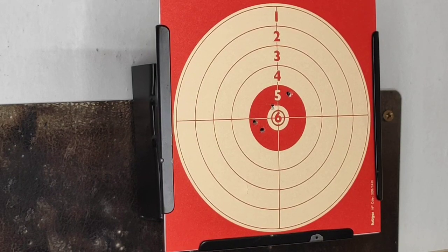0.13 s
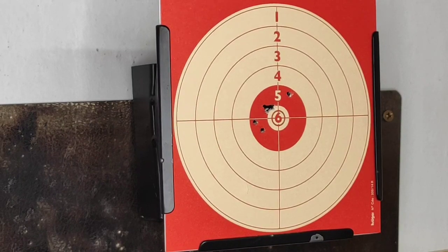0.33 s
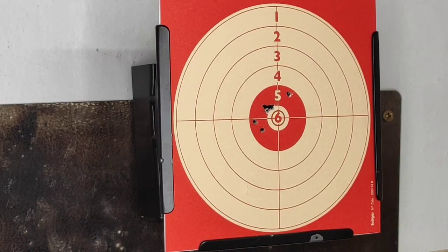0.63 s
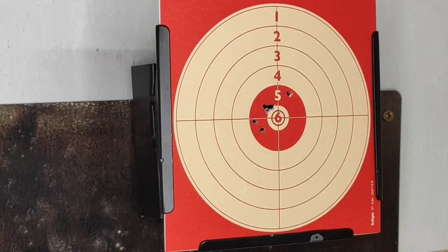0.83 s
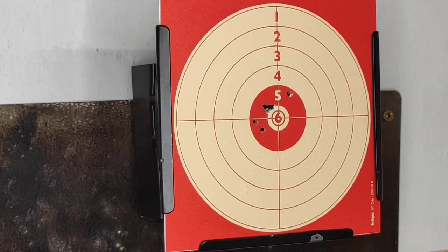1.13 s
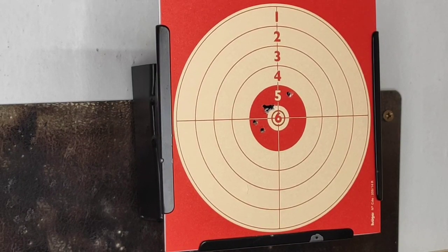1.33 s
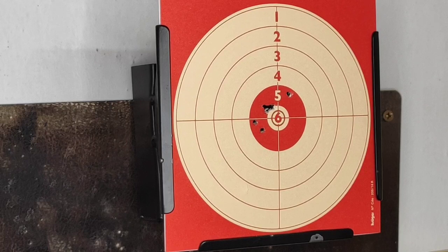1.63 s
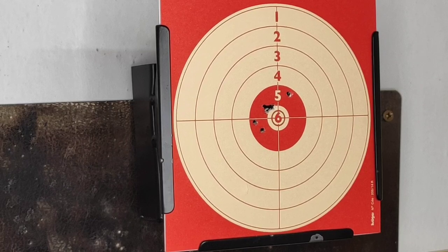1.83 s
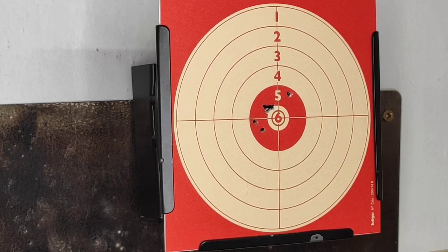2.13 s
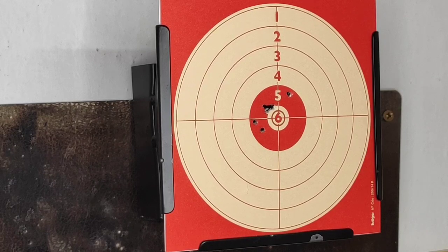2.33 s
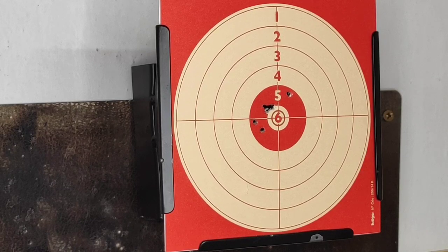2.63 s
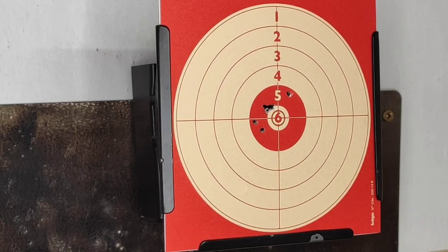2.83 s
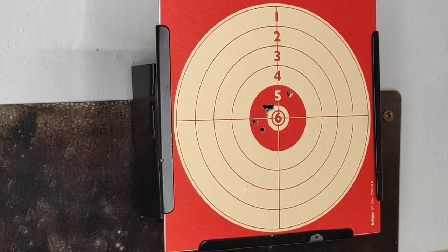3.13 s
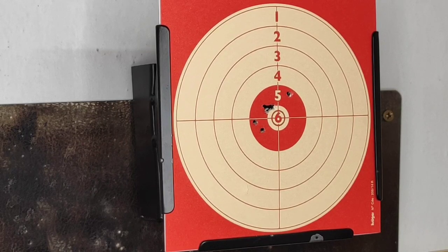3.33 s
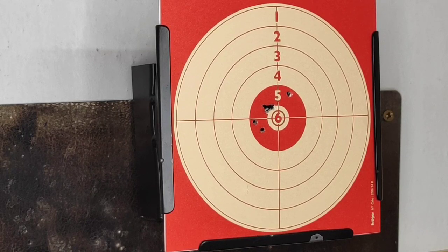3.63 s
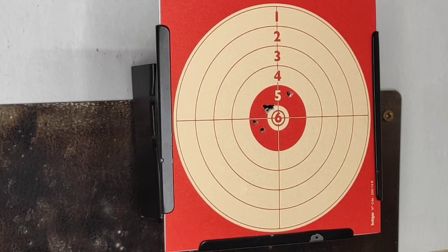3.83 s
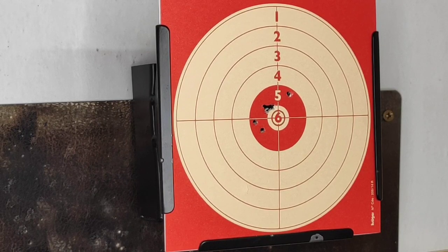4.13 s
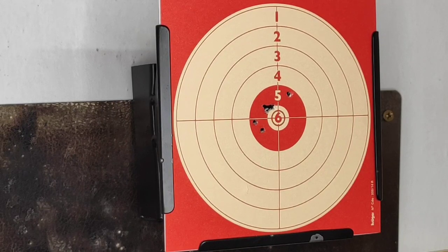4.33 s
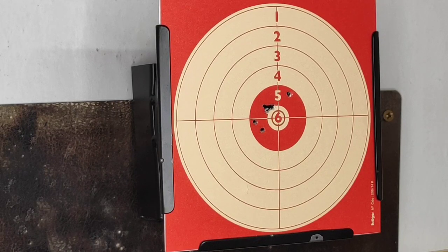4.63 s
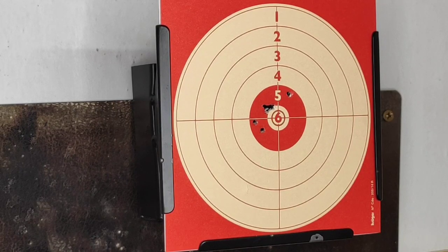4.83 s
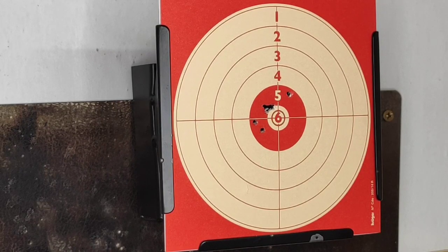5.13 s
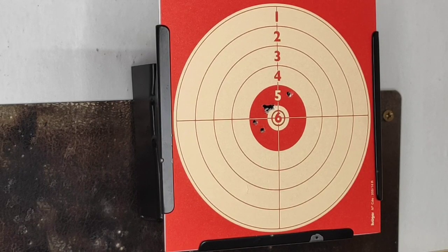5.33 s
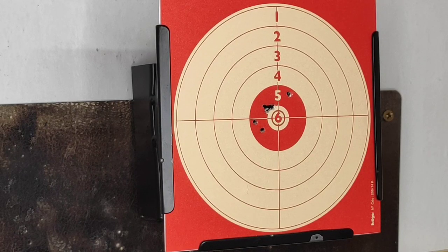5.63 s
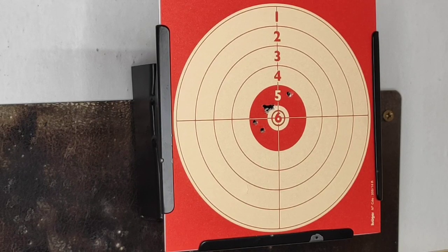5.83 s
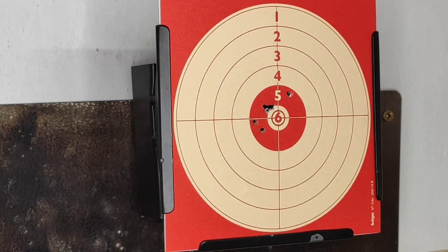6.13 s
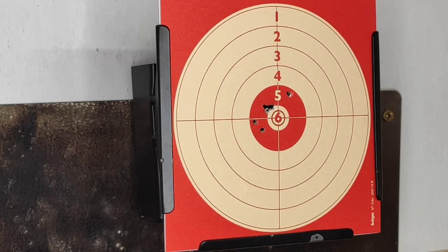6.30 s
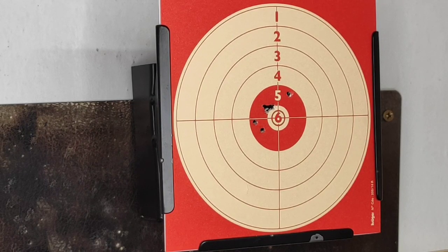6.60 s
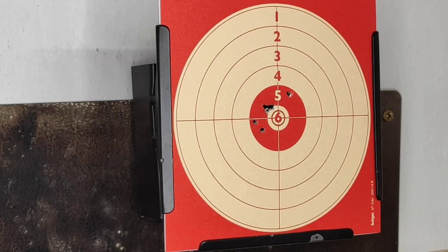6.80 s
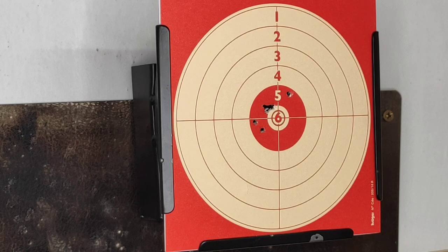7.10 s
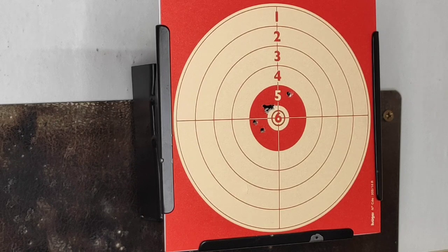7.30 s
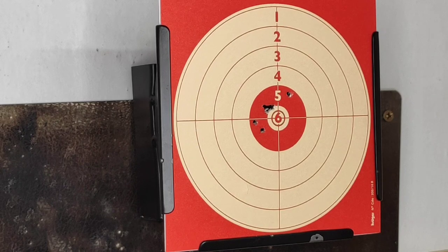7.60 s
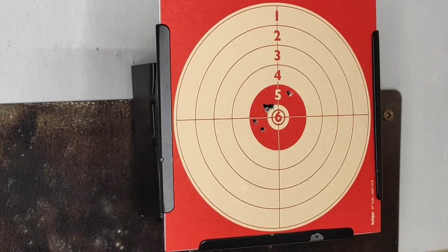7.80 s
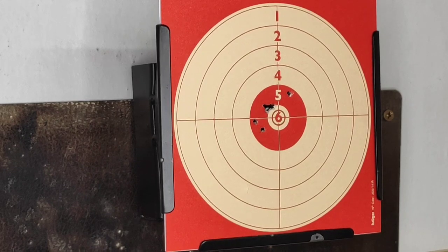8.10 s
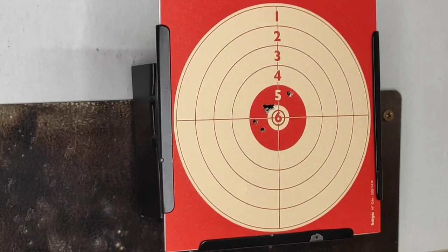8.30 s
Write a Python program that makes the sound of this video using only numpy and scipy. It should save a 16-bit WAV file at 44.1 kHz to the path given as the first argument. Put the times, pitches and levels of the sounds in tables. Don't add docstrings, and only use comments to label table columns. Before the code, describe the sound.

A sharp, clipped crack and steel impact come first, close to the microphone, ringing through a reverberant bare room. Afterwards, towards the left and farther away, hands handle the gun: a breathy air rush, a bright latch snap, small knocks, two hard clacks each preceded by a tiny squeak, then a longer, rougher hiss with sticking ticks and a few faint final taps.

```python
import sys
import numpy as np
from scipy import signal
from scipy.fft import rfft, irfft, next_fast_len
from scipy.io import wavfile
from scipy.ndimage import uniform_filter1d

SR = 44100
rng = np.random.default_rng(int(sys.argv[2]) if len(sys.argv) > 2 else 0)


def persist_wave(psi):
    counts = np.round(np.clip(psi, -1, 1) * 32767).astype(np.int16)
    wavfile.write(sys.argv[1], SR, np.atleast_2d(counts).T)


def makeup_ratio(level_db):
    decades = np.asarray(level_db, float) / 20
    return 10 ** decades


N = 372837

# f/Hz, gain/dB
MICROPHONE = [(20, 6), (1500, 6), (4000, 2), (8800, 2), (9700, -5), (10600, -11.5), (13000, -7.5),
              (15500, -11)]
# t/s, peak level/dB, brightness/dB, ring f/Hz
SLIPS = [(2.1334, -37, -9, 7600), (2.2267, -37.5, 2, 6570), (2.2896, -42, 3, 6200), (7.369, -36, 2, 3130),
         (7.4105, -38, 3, 3680), (7.4648, -29, 1, 6590), (7.5377, -30.5, 0, 3720),
         (7.6223, -32.5, -1, 3730), (7.6871, -35, -3, 6580)]


def unit(x):
    return x / np.sqrt(np.mean(x ** 2) + 1e-20)


def along(points, hz):
    f, v = np.transpose(points)
    return np.interp(np.log(hz + 1), np.log(f + 1), v)


def filtered(x, response):
    n = x.shape[-1]
    m = next_fast_len(n + 8192)
    return irfft(rfft(x, m) * response(np.fft.rfftfreq(m, 1 / SR)), m)[..., :n]


def add(total, part, s):
    spot = total[..., int(s * SR):][..., :part.shape[-1]]
    spot += part[..., :spot.shape[-1]]


def section(*corners):
    s, db = np.transpose(corners)
    t = np.arange(s[0], s[-1], 1 / SR)
    return t, np.interp(t, s, db)


def lift(hz, peaks):
    return sum(db / (1 + (2 * (hz - c) / w) ** 2) for c, w, db in peaks)


def patchy(n, depth_db):
    z = signal.stft(rng.standard_normal(n + 512), nperseg=512)[2]
    field = uniform_filter1d(rng.standard_normal(z.shape), size=3, axis=0)
    field = uniform_filter1d(field, size=14, axis=1)
    return signal.istft(z * makeup_ratio(depth_db * unit(field)), nperseg=512)[1][:n]


def walls(wet_db, left_db, rise):
    # f/Hz, t60/s
    room = [(60, 0.35), (300, .5), (1000, 0.42), (3000, 0.45), (8000, 0.36), (13000, 0.29)]
    hz, t, z = signal.stft(rng.standard_normal((2, int(.55 * SR))), SR, nperseg=256)
    decay = makeup_ratio(-60 * t / along(room, hz)[:, None])
    tail = signal.istft(z * decay, SR, nperseg=256)[1]
    t = np.arange(tail.shape[1]) / SR
    echoes = uniform_filter1d(rng.standard_normal(tail.shape), size=25) * 5
    tail = tail * (1 - np.exp(-t / rise)) * makeup_ratio(4 * np.exp(-t / .06) * echoes)
    tail = tail / np.linalg.norm(tail, axis=1)[:, None]
    return makeup_ratio(wet_db) * tail * makeup_ratio([[left_db / 3], [-left_db / 3]])


def direct(x, left_db, size):
    lag = 13
    left = np.pad(x, (0, size))[:size]
    right = np.pad(x, (lag, size))[:size]
    return np.array([left, right]) * makeup_ratio([[left_db / 2], [-left_db / 2]])


def heard(x, wet_db, left_db):
    echoes = signal.fftconvolve(x[None], walls(wet_db, left_db, rise=0.0037), axes=1)
    return echoes + direct(x, left_db, size=echoes.shape[1])


def blow(db, low_db, mid_db, high_db, ring_hz, t60, wet_db, left_db):
    # f/Hz, width/Hz, lift/dB
    gun = [(520, 150, 2.5), (927, 53, -2.5), (1200, 67, -5), (2130, 1400, 6.5), (3360, 400, 2),
           (4120, 540, 4), (5100, 100, -5.5), (7130, 600, -11)]
    colour = [(150, low_db - 26.5), (330, 1.5 * low_db - 2.5), (520, low_db + 0.6), (800, low_db + 4.5),
              (1500, (low_db + mid_db) / 2 - 0.8), (2600, mid_db), (6500, 0), (12500, high_db + 17)]
    body = [(c, w, level * rng.uniform(0, 0.83)) for c, w, level in gun]
    body += [(ring_hz, 0.081 * ring_hz, 6)]
    small_hz = 500 * 24 ** rng.random(24)
    body += [(c, .03 * c, 5.5 * u) for c, u in zip(small_hz, rng.random(24))]
    burst = rng.standard_normal(8192) * makeup_ratio(-60 * np.arange(8192) / SR / t60)
    echoes = walls(wet_db, left_db, rise=t60 / 3)
    both = echoes + direct(burst / np.linalg.norm(burst), left_db, size=echoes.shape[1])
    return makeup_ratio(db + 20.5) * filtered(both, lambda hz: makeup_ratio(along(colour, hz) + lift(hz, body)))


def struck(rows, part):
    out = np.zeros((2, N))
    mid_db, high_db, *room = part
    for s, db, heft_db, bright_db, ring_hz in rows:
        thinned_db = mid_db - .7 * bright_db
        add(out, blow(db, heft_db, thinned_db, high_db + bright_db, ring_hz, *room), s)
    return out


def floor():
    # f/Hz, level/(dB per Hz)
    still_air = [(8, -32.5), (15, 4), (25, -6.5), (38, -15.5), (74, -21), (205, -29), (520, -34),
                 (1760, -44), (4000, -50), (9000, -53), (10300, -57.5), (12500, -52.5), (15600, -53.5)]
    noise = filtered(rng.standard_normal((2, N)), lambda hz: makeup_ratio(along(still_air, hz)))
    return makeup_ratio(-55.5 + 3.5) * unit(noise)


def contacts():
    # t/s, peak level/dB, heft/dB, brightness/dB, ring f/Hz
    taps = [(0.2924, -56, 6, -8, 2060), (3.1222, -49, -19, 2, 2410), (3.2552, -45, -24, 1, 6160),
            (7.8056, -41, -4.5, -3, 4160)]
    nudges = [(0.8597, -57, -7, 0, 1227), (0.9189, -54, -11, -4, 1020), (1.1307, -57, -2, 2, 2360),
              (1.2639, -48, -6, -6, 2600), (1.696, -45, -12, 0, 8830), (3.5246, -52.5, -28, 2, 3720),
              (3.7423, -44.5, -15, -3, 2190), (4.33, -52.5, -11, -3, 3020), (4.5601, -40.5, -9.5, 3, 3340),
              (4.7865, -44, -1, 0, 902), (4.7923, -33, -3, -3, 340), (4.9857, -44, -7, -7, 1930),
              (5.1551, -43, -26, 4, 8740), (5.525, -30.5, -7, 3, 2147), (5.8155, -53.5, -5.5, 4, 2138),
              (6.847, -50.5, 2, -6, 1040), (6.9698, -56.5, -6, 2, 5800), (7.0932, -34, -13, 1, 7040),
              (7.889, -52.5, -1.5, -4, 4110)]
    latches = [(1.4085, -46.5, -14, -3.5, 9000), (1.6139, -44, -16, 3, 8300), (2.398, -42, -9, -5, 8600),
               (2.4636, -34, -19, -4, 6800), (2.5414, -14.5, -22, 1.5, 7130),
               (2.762, -29.5, -9.5, -2.5, 7470), (4.483, -23.5, -17, 0, 8830),
               (5.1644, -31.5, -17, 6, 9060), (6.2776, -34, -24, 0, 5240)]
    clacks = [(1.726, -32, -21, -1, 2770), (3.5433, -41, -16, 3, 3710), (3.5707, -21, -15.5, -3, 1500),
              (3.9914, -58, -11, 2, 3065), (4.2457, -53, 3, 3, 877), (5.3071, -4.5, -8.5, -1, 2190),
              (6.0204, -40, -8, -7, 2730), (6.3653, -2, -9, 0, 2327), (7.968, -55, -3, 0, 3950),
              (8.308, -63, -12, 0, 1053)]
    openings = [(4.8083, -26.5, -7, -2, 1310), (5.831, -40, -4, 0, 1274), (5.8432, -28, -5, 1, 1290)]
    ticks = [(s, db, -15, *rest) for s, db, *rest in SLIPS]
    # mid/dB, high/dB, burst t60/s, echo level/dB, left/dB
    damped = (-4, -31, .018, 8, 8)
    latch, lever = (-8, -16, .018, 8, 8), (-3.5, -15.5, .018, 8, 8)
    piston, slide = (-16, -8, .018, 8, 8), (-6, -16, .053, 7.5, 10)
    hollow = (-4, -18, .053, 7.5, 10)
    kinds = [(latches, latch), (clacks, lever), (taps, damped),
             (ticks, piston), (nudges, slide), (openings, hollow)]
    return makeup_ratio(-3) * sum(struck(*kind) for kind in kinds)


def shot():
    # t/s, peak level/dB, heft/dB, brightness/dB, ring f/Hz
    impacts = [
        (0.338, -28.5, -6.5, 0, 4990),
        (0.3454, -1.5, -13, -3, 6624),
        (.379, 1, -21, 0, 1900),
    ]
    # f/Hz, level/dB, t60/s
    trap = [(737, -7.5, .2), (1890, -20, .55)]
    blast = (-9.5, -10, .014, 14.5, 10.5)  # mid/dB, high/dB, burst t60/s, echo level/dB, left/dB
    out = struck(impacts, blast)
    t = np.arange(SR // 2) / SR
    ring = sum(makeup_ratio(db - 60 * t / t60) * np.sin(2 * np.pi * hz * t) for hz, db, t60 in trap)
    add(out, heard(ring * (1 - np.exp(-t / .008)), wet_db=-12, left_db=1.5), .392)
    return out


def thuds():
    # t/s, level/dB, top f/Hz, t60/s
    shocks = [(.346, -29, 59.63, .9), (.378, -14.5, 299, 0.14), (4.8, -47.5, 153.3, 0.16),
              (5.307, -79, 101.7, 0.16), (6.365, -44, 103, 0.22), (7.69, -49, 300, 0.78),
              (7.8, -65, 250, 0.43)]
    out, t = np.zeros((2, N)), np.arange(SR // 2) / SR
    for s, db, top_hz, t60 in shocks:
        dull = lambda hz: (hz > 18) / (1 + (hz / top_hz) ** 3)
        noise = unit(filtered(rng.standard_normal((2, len(t))), dull))
        add(out, makeup_ratio(db - 60 * t / t60) * (1 - np.exp(-t / .003)) * noise, s)
    return out


def settling():
    # t/s, left amplitude, right amplitude, width/s
    jolts = [(.347, .45, 0, .002), (.381, .1, .35, .006)]
    clock = np.arange(N) / SR
    t = clock - np.array([[.372], [.362]])
    age = np.clip(t, .036, None)
    swing = np.sin(np.pi * np.log(age / .06)) * np.exp(-(age / .29) ** 1.6)
    start = np.clip((t - [[-.012], [-.018]]) / [[.04], [.008]], 0, 1)
    kicks = sum(np.outer([left, right], np.exp(-((clock - s) / width) ** 2))
                for s, left, right, width in jolts)
    return np.array([[.32], [.27]]) * start * swing + kicks


def rustle():
    moves = [(.53, -33.5, 300, 165), (1.3, -62, 12, 8), (2.03, -44, 50, 45), (2.7, -61, 10, 60),
             (3.69, -52, 200, 150), (4.75, -63, 12, 5), (5.39, -37.5, 140, 110), (6.45, -37, 190, 95),
             (7.22, -45, 150, 22)]
    # f/Hz, level/(dB per Hz)
    cloth_colour = [(500, -29.5), (1500, -3.5), (2500, -0.5), (4200, -0.5), (9000, -7.5), (15000, -16.5)]
    t = np.arange(N) / SR
    db = np.max([top - np.maximum(rise * (s - t), fall * (t - s)) for s, top, rise, fall in moves], axis=0)
    cloth = unit(filtered(patchy(N, depth_db=4.5), lambda hz: makeup_ratio(along(cloth_colour, hz))))
    return heard(makeup_ratio(db - 7) * cloth, wet_db=-0.5, left_db=7)[:, :N]


def column(f, modes):
    tube = sum(makeup_ratio(db) * 1j * f * w / (c * c - f * f + 1j * f * w) for c, w, db in modes)
    return tube / (1 + (190 / (f + 1)) ** 6)


def pump():
    strokes = [
        (1.72, 1.79, 1.96, 2.24, -35),
        (7.085, 7.16, 7.33, 7.76, -32.5),
    ]
    # f/Hz, level/(dB per Hz)
    hisses = [
        [(710, -15.5), (1200, -7.5), (1900, -13), (3020, -7), (3510, -10.5), (4940, -0.5), (6670, -4.5),
         (9010, 0.5), (10700, -11.5), (13500, -2), (15600, -10.5)],
        [(710, -42), (1200, -26.5), (2330, -13.5), (2620, -11.5), (3050, -9), (3860, -7), (4780, 0.5),
         (8820, -7.5), (10200, -13), (13200, -1.5), (15600, -15.5)],
    ]
    # f/Hz, width/Hz, level/dB
    streaks_each = [
        [(3000, 83, -16), (3680, 31, -12), (5000, 66, -17), (9200, 55, 2), (8880, 54, -1), (9700, 30, -11),
         (11650, 53, -3), (13200, 99, -19), (14010, 25, -13)],
        [(3050, 44, 2), (3726, 35, -10), (4200, 47, -6), (4740, 139, -21), (6590, 61, -6), (7950, 46, -5),
         (8500, 38, 10), (9070, 77, 22), (11280, 170, 0), (12600, 47, -7), (13500, 100, -6.5)],
    ]
    # f/Hz, width/Hz, level/dB
    tubes = [
        [(290, 90, -3), (700, 150, -2), (1100, 80, -1), (1700, 80, -1)],
        [(250, 30, -8), (305, 22, 5), (420, 50, -7), (590, 35, -6), (760, 60, -6), (945, 14, 6), (1170, 35, -8),
         (1515, 25, -7), (1740, 30, -6)],
    ]
    hums_db = (-24.5, -16.5)
    push_s, early_db, late_db = .02, -7, -19
    surge_top_db, surge_s, hum_surges = 5, .04, 1.1
    out = np.zeros((2, N))
    for stroke, hum_db, colour, streaks, modes in zip(strokes, hums_db, hisses, streaks_each, tubes):
        s, full, slack, end, db = stroke
        t, flow_db = section((s, db - 30), (s + push_s, db + early_db), (full, db), (slack, db),
                             (end, db + late_db))
        surge_db = sum(surge_top_db * (t > slip) * np.exp(-np.abs(t - slip) / surge_s)
                       for slip, *_ in SLIPS)
        wall = [(c, w + 80, level / 3 + 7) for c, w, level in streaks]
        tone = lambda hz: makeup_ratio(along(colour, hz) + lift(hz, wall) - along(MICROPHONE, hz))
        hiss = unit(filtered(patchy(len(t), depth_db=3), tone))
        grit = makeup_ratio(2.3 * unit(uniform_filter1d(rng.standard_normal(len(hiss)), size=150)))
        hum = unit(filtered(patchy(len(t), depth_db=2), lambda f: column(f, modes)))
        air = makeup_ratio(surge_db - 2.5) * grit * hiss + makeup_ratio(hum_surges * surge_db + hum_db - 6) * hum
        add(out, heard(makeup_ratio(flow_db) * air, wet_db=3.0, left_db=9.5), s)
    return out


def squeals():
    whistles = [(5.218, 5.306, 5120, 4980, -36), (6.274, 6.364, 5330, 5130, -36)]
    overtones = [(-45, 0, -35, -28, -40, -16), (-20, 0, -3, -10, -10, -12)]
    rasps_db = (-22, -9)
    # t/s, f/Hz, level/dB, length/s
    groan = (6.25, 930, -55, .07)
    catch_s, catch_sharp, swell_db = .007, .045, 4
    droop, droop_s = .06, .01
    out = np.zeros((2, N))
    for (s, end, first_hz, last_hz, db), levels, rasp_db in zip(whistles, overtones, rasps_db):
        t, level_db = section((s, db - 18), (s + catch_s, db), (end, db + swell_db))
        bend = 1 + catch_sharp * np.exp((s - t) / catch_s) - droop * np.exp((t - end) / droop_s)
        hz = np.interp(t, [s, end], [first_hz, last_hz]) * bend
        wander = uniform_filter1d(rng.standard_normal((2, len(hz))), size=130)
        jitter, flutter = (unit(v) for v in wander)
        turn = np.cumsum(np.pi * hz * (1 + .013 * jitter) / SR)
        tone = sum(makeup_ratio(level - k * 30 * (t - s)) * np.sin((k + 1) * turn)
                   for k, level in enumerate(levels))
        dry_rub = filtered(rng.standard_normal(len(t)), lambda f: f ** 2 / (1 + (f / 5500) ** 4))
        uneven = makeup_ratio(3 * flutter) * tone + makeup_ratio(rasp_db) * unit(dry_rub)
        add(out, makeup_ratio(4) * heard(makeup_ratio(level_db) * uneven, wet_db=-3, left_db=9), s)
    s, hz, db, length = groan
    t = np.arange(0, length, 1 / SR)
    swell = np.sin(np.pi * np.sqrt(t / length))
    add(out, heard(makeup_ratio(db) * swell * np.sin(2 * np.pi * hz * t), wet_db=-6.5, left_db=8), s)
    return out


def scene():
    room_sound = shot() + contacts() + pump() + squeals() + rustle()
    return filtered(room_sound, lambda hz: makeup_ratio(along(MICROPHONE, hz))) + floor()


def roll_off(x):
    return signal.sosfilt(signal.butter(12, 15710, fs=SR, output="sos"), x)


def record(dry):
    loud = np.sqrt(np.abs(uniform_filter1d(dry ** 2, size=400, axis=1)))
    held = dry / (1 + (loud / 0.41) ** 4) ** (1 / 4)
    rounded = held / (1 + np.abs(held / .8) ** 4) ** (1 / 4)
    shaken = rounded + settling() + thuds()
    mix = filtered(shaken, lambda hz: np.clip((15750 - hz) / 300, 0, 1))
    return roll_off(np.clip(mix, -1, 1))


dry = scene()
out = record(dry)
persist_wave(out)
```